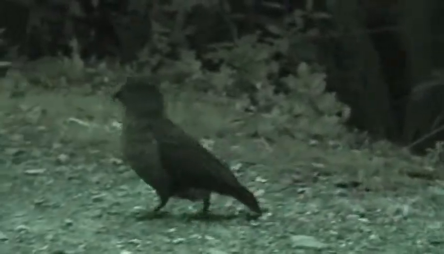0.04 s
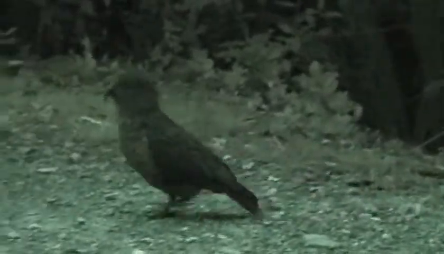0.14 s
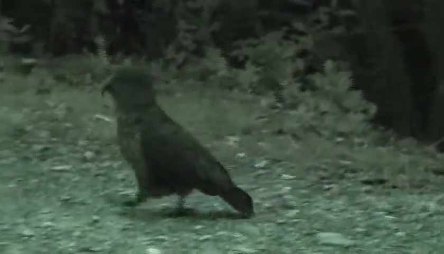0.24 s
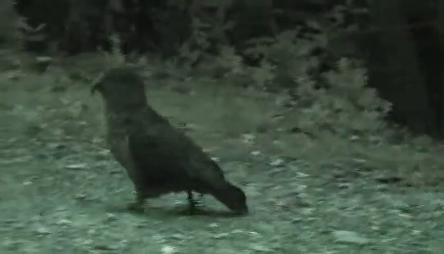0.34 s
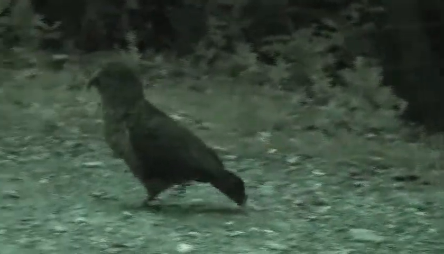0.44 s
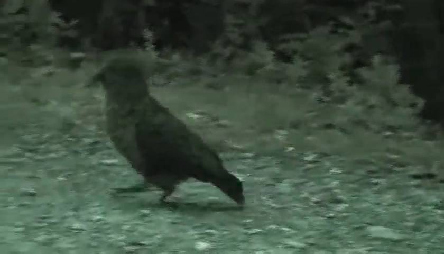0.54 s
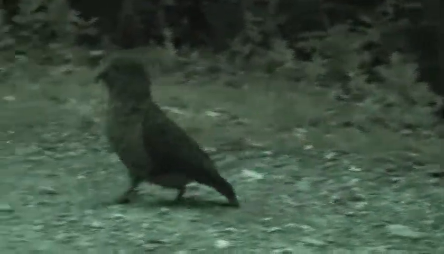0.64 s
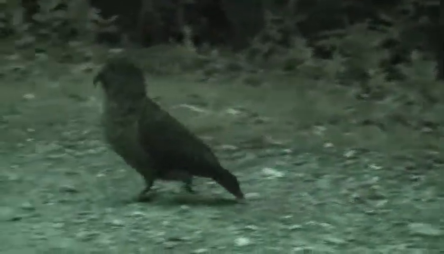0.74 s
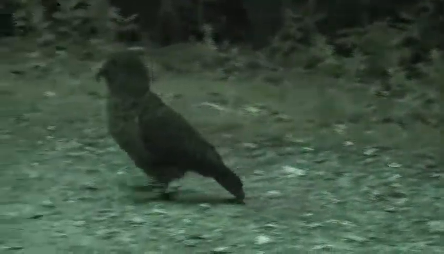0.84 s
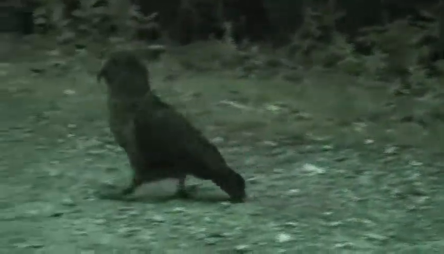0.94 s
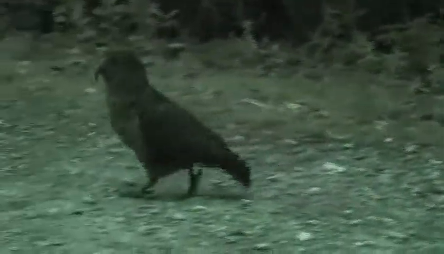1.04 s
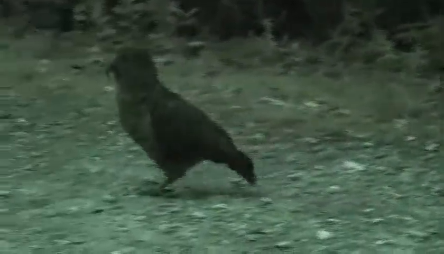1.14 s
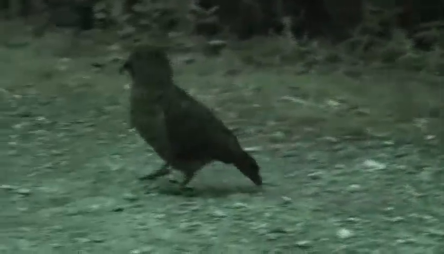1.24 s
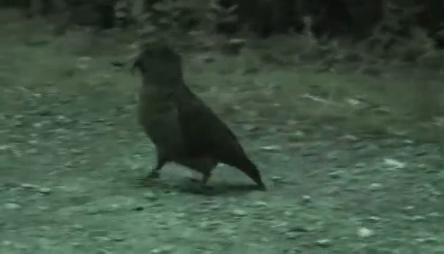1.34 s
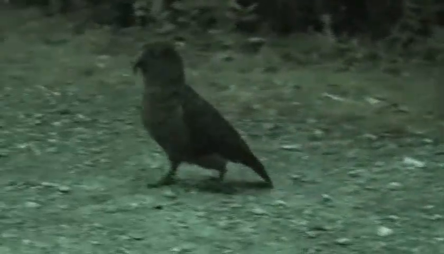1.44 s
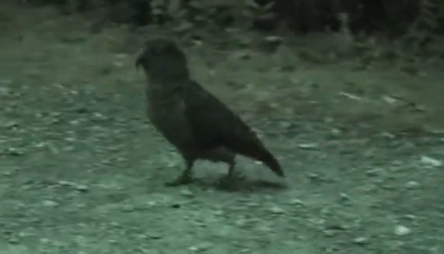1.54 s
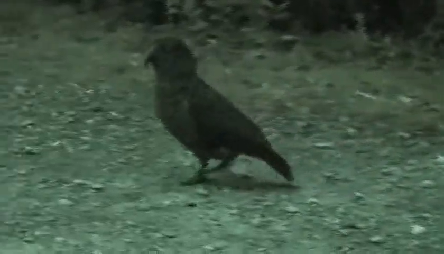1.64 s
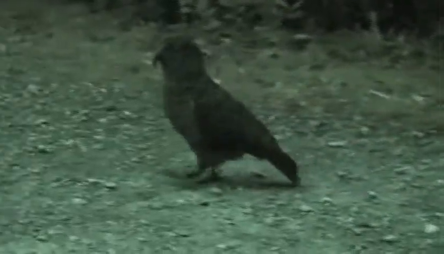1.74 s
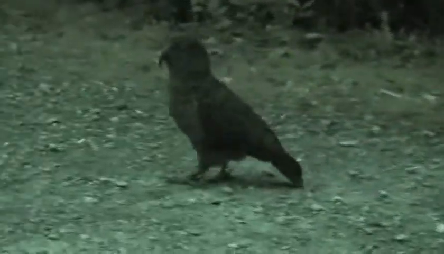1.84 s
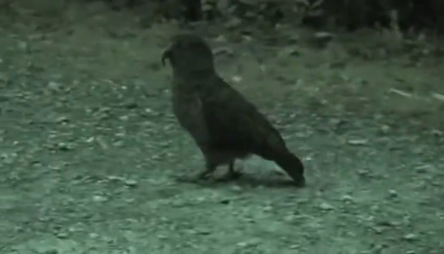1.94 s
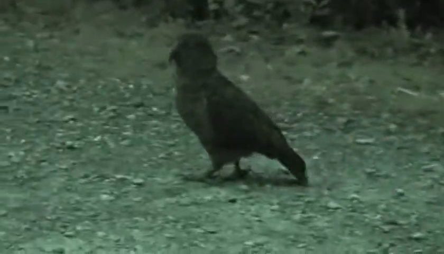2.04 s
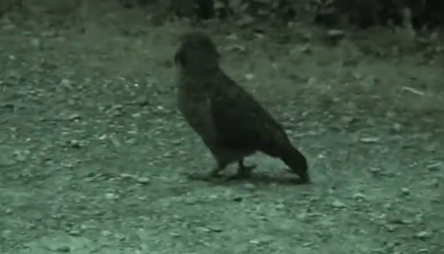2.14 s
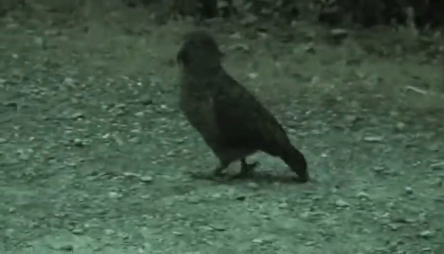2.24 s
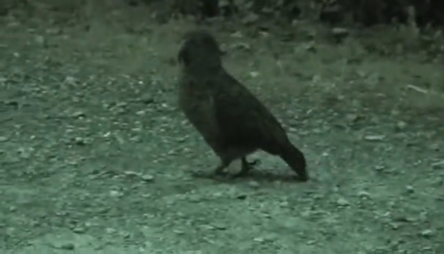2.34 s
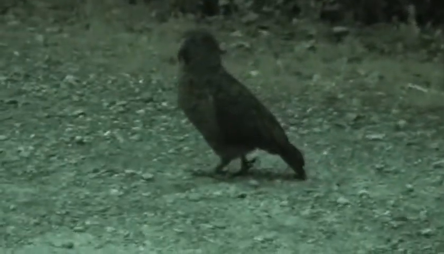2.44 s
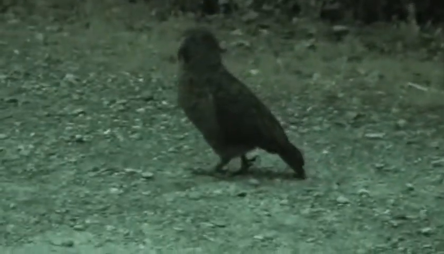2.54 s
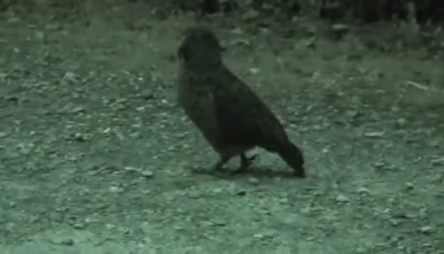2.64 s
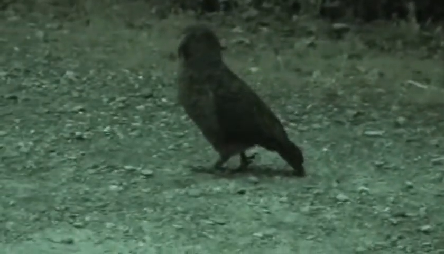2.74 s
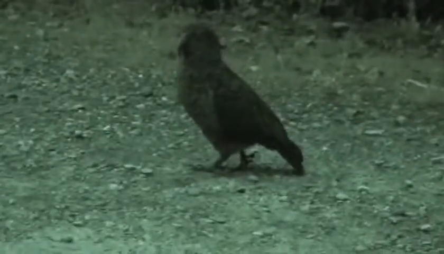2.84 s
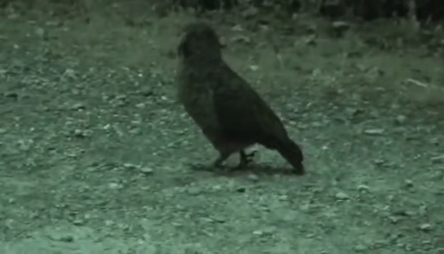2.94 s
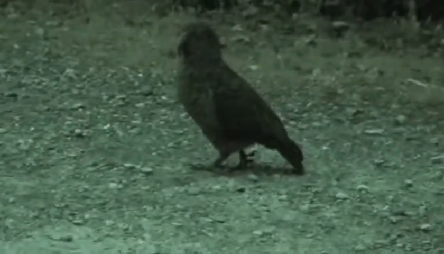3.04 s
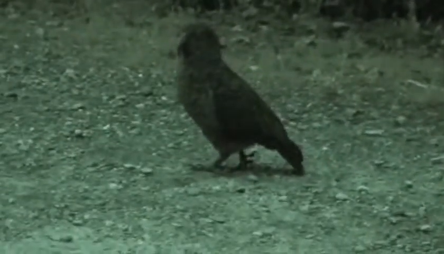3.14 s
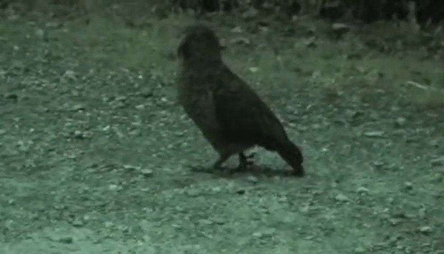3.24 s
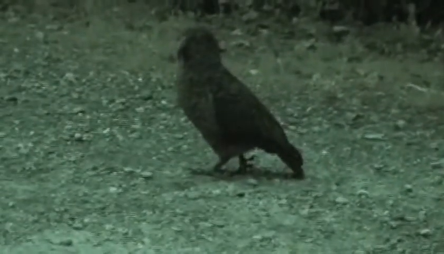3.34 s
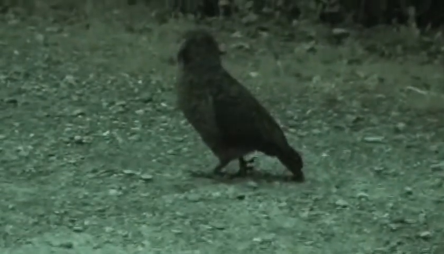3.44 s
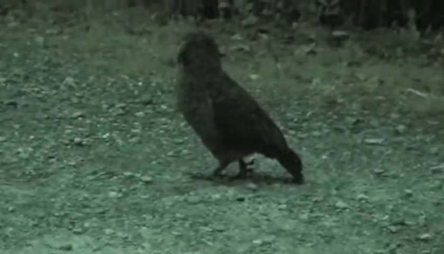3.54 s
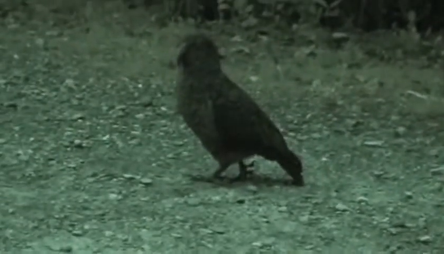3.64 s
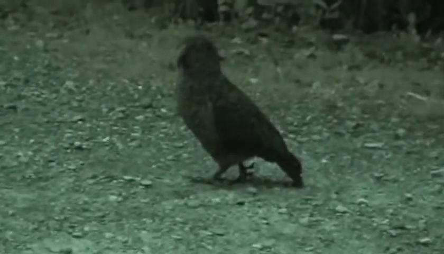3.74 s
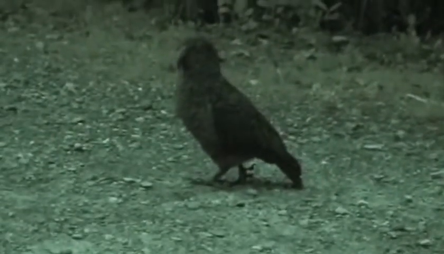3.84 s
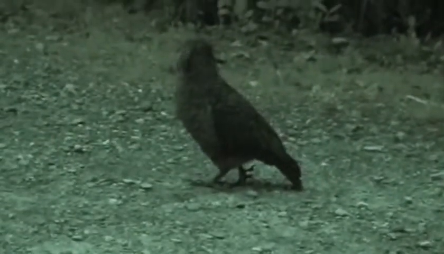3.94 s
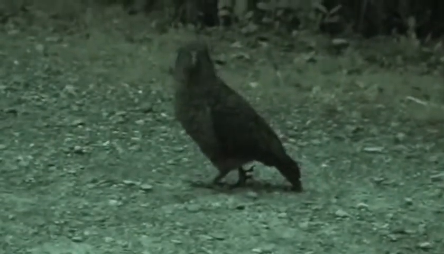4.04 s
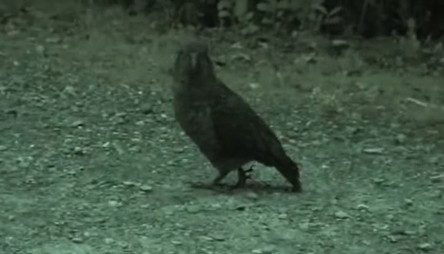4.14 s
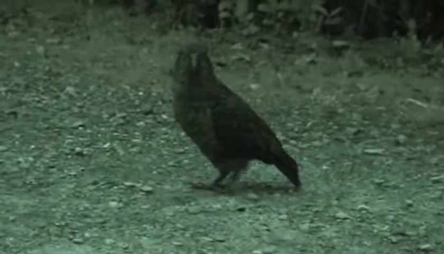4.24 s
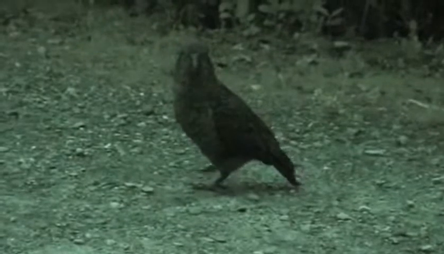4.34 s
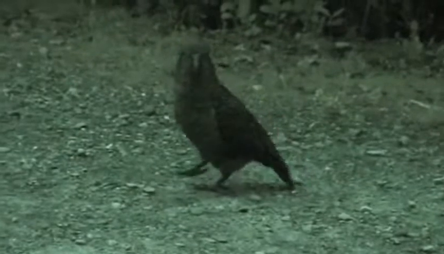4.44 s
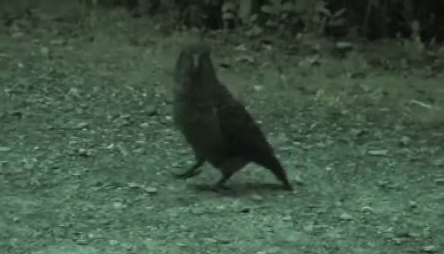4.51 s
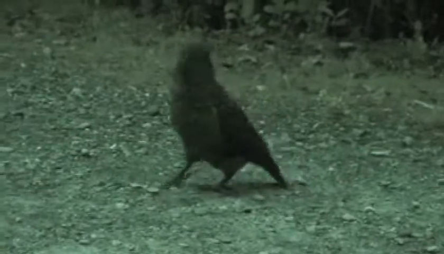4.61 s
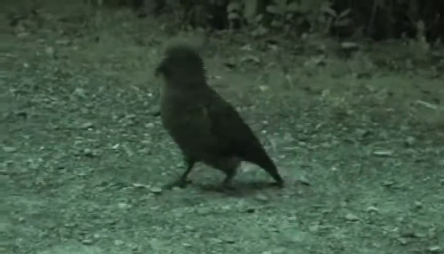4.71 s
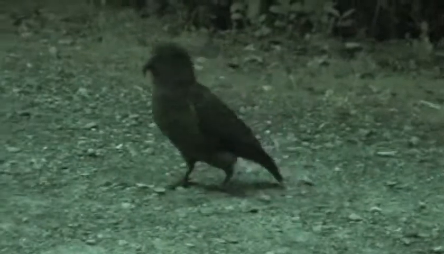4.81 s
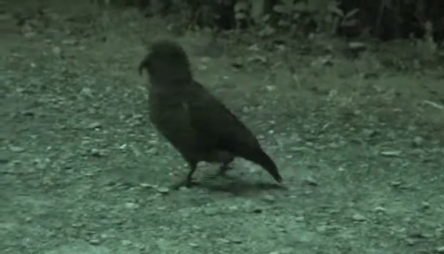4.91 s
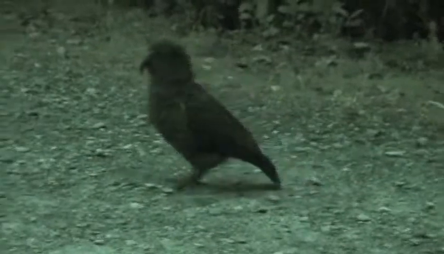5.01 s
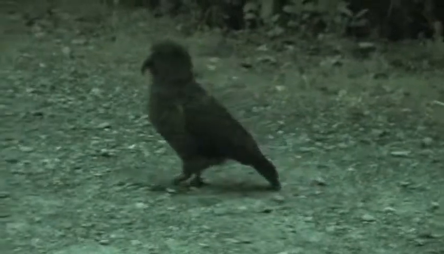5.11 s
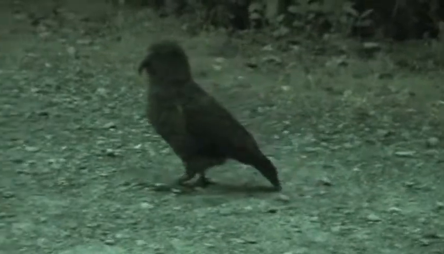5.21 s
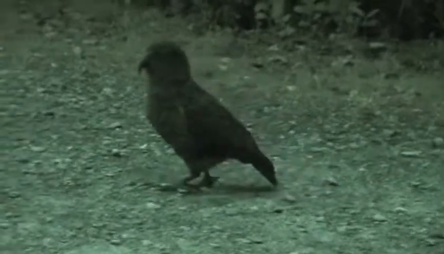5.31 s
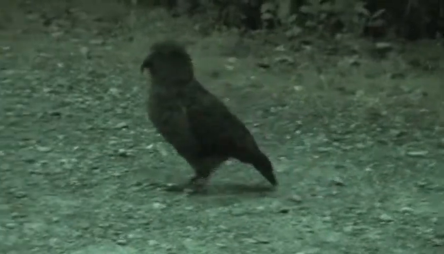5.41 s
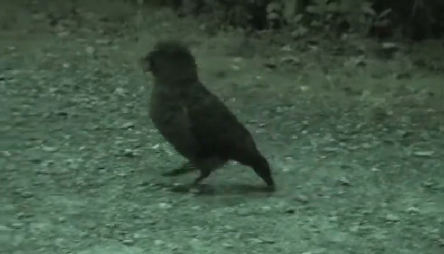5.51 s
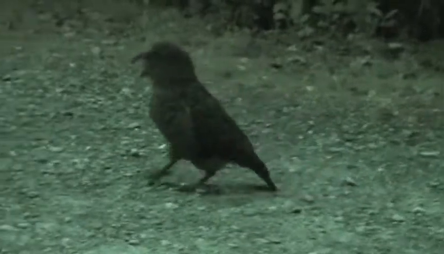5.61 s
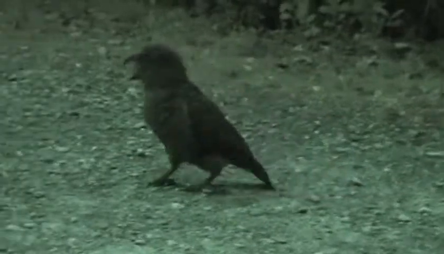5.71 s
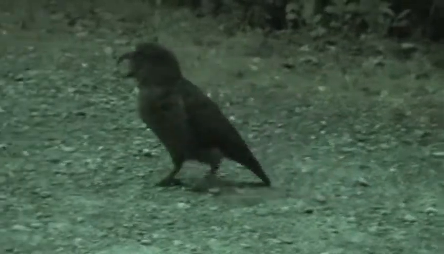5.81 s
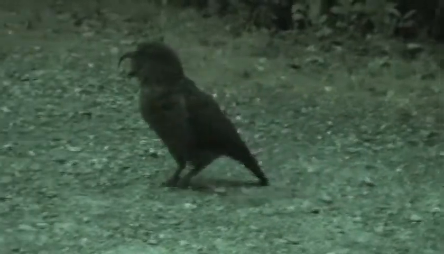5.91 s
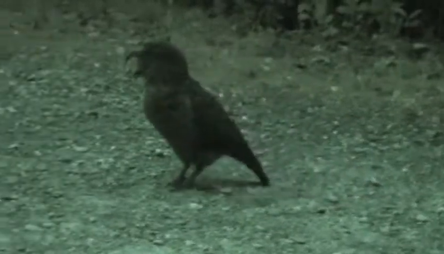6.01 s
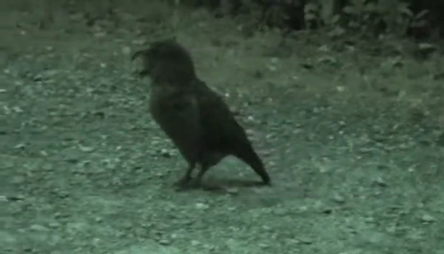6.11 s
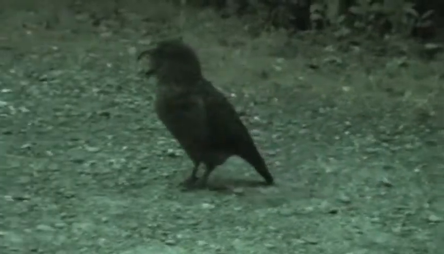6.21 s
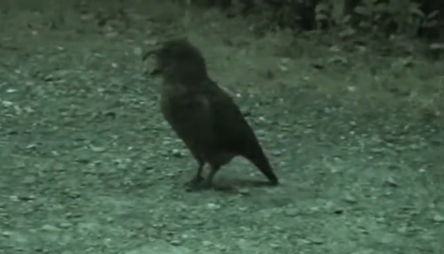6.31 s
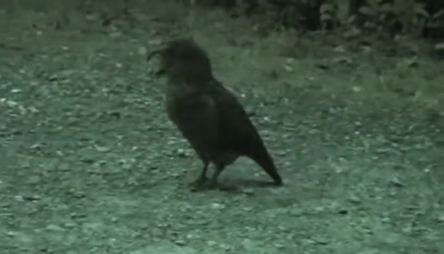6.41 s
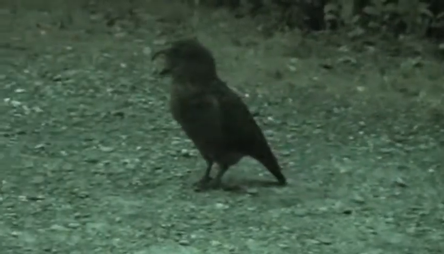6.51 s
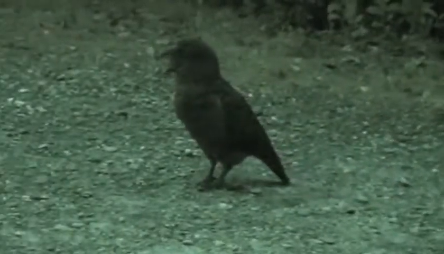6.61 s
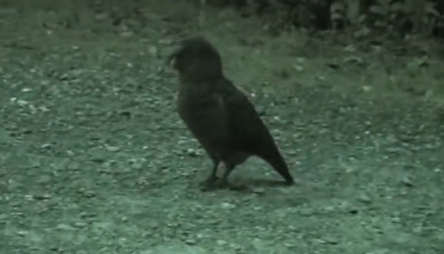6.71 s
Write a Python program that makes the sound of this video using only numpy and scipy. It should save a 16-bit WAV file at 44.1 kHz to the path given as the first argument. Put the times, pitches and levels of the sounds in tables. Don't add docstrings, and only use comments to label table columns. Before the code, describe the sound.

Over a faint stream rush and tiny distant birdsong, a parrot gives one loud, harsh, trilled falling scream late on, then quiet returns.

```python
import sys
import numpy as np
from scipy import signal
from scipy.fft import rfft, irfft
from scipy.io import wavfile
from scipy.ndimage import uniform_filter1d

SR = 44100
rng = np.random.default_rng(int(sys.argv[2]) if len(sys.argv) > 2 else 0)


def wrap_up_sound(samples):
    columns = np.atleast_2d(samples).T
    tamed = np.clip(columns, -1, 1)
    steps = np.round(tamed * 32767).astype(np.int16)
    wavfile.write(sys.argv[1], SR, steps)


def elevation(decibels):
    levels = np.asarray(decibels, float)
    return 10 ** (levels / 20)


N = 298116
T = np.arange(N) / SR
START_S, CLOSE_S, CLOSE_LENGTH_S = 5.604, 6.642, .019


def lookup(table, hz):
    f, db = np.transpose(table)
    return np.interp(np.log(np.maximum(hz, 1)), np.log(f), db)


def unit(x):
    return x / np.sqrt(np.mean(x ** 2))


def colour(x, *tables):
    hz = np.arange(len(x) // 2 + 1) * SR / len(x)
    return irfft(rfft(x) * elevation(sum(lookup(t, hz) for t in tables)), len(x))


def walk(rate, size=N):
    k = max(int(SR / rate), 1)
    return unit(uniform_filter1d(uniform_filter1d(rng.standard_normal(size), k), k))


def pan(x, db):
    return x * elevation(np.array([[db / 2], [-db / 2]]))


def step(t, at, width):
    return 1 / (1 + np.exp(-np.clip((t - at) / width, -30, 30)))


def opening(t):
    return step(t, 5.635, .005)


# (time [s], pitch before the voice break [Hz], level [dB], brightness [dB], breath [dB])
EFFORT = [
    (5.69, 1145, -6.7, 3, -25),
    (5.76, 1122, -9.3, -2, -35),
    (5.9, 1100, -8.3, -2, -32),
    (6.04, 1073, -10.5, -0.5, -29),
    (6.185, 1000, -10.5, 0.5, -25),
    (6.255, 1012, -11.5, 0, -26),
    (6.37, 952, -12.5, -5, -27),
    (6.52, 870, -14, -7.5, -27),
    (6.645, 778, -18, -11, -31),
]


def scream(t):
    s, *columns = np.transpose(EFFORT)
    hz, db, bright_db, breath_db = (np.interp(t, s, c) for c in columns)
    age = t - START_S
    thin = 1 - opening(t)
    break_s, break_width_s, recover_s = 6.396, .008, .07
    broken = step(t, break_s, break_width_s)
    weak = step(t - .01, break_s, break_width_s) * np.exp(-np.maximum(t - break_s, 0) / recover_s)
    closing = (np.maximum(t - CLOSE_S, 0) / CLOSE_LENGTH_S) ** 2
    scoop_hz, scoop_s, overshoot_hz, settle_s = 400, .017, 22, .014
    hz = hz - scoop_hz * np.maximum(1 - age / scoop_s, 0)
    hz = hz + overshoot_hz * np.exp(-abs(age - scoop_s) / settle_s)
    flick_hz, flick_s, floor_hz = 45, .016, 570
    hz = np.maximum(hz - 62 * broken - flick_hz * np.exp((t - CLOSE_S) / flick_s), floor_hz)
    swell_db = -33 * np.exp(-age / .006)
    db = db + swell_db - 8 * thin - 10 * weak - 50 * closing
    bright_db = bright_db - 16 * np.exp(-age / .008) + 5 * thin - 12 * closing
    return hz, db, bright_db, breath_db + 6 * (weak + closing)


# (time [s], depth [dB], pitch leap [Hz], raised shelf after it [Hz])
TRILL_CATCHES = [(5.714, -2.5, 25, 8), (5.774, -4, 44, 8), (5.83, -4, 40, 10), (5.886, -6, 130, 15),
                 (5.9405, -25, 60, 15), (5.992, -5, 146, 22), (6.048, -8, 120, 33), (6.1005, -6, 140, 42),
                 (6.154, -4.5, 150, 50), (6.2115, -3, 167, 68), (6.262, -1, 15, 12)]


def trill(t, hz, db):
    shelf_s, lead_s, rebound_db, rebound_s, arch = .019, .014, 1.5, .025, .25
    choke_db = 0
    for at, depth_db, leap_hz, shelf_hz in TRILL_CATCHES:
        d = t - at
        half = .003 - .00006 * depth_db
        db = db + rebound_db * step(d, half, .001) * np.exp(-np.maximum(d, 0) / rebound_s)
        creep = np.exp(np.minimum(d, 0) / lead_s)
        hold = np.where(d < 0, creep, 1 - step(d, shelf_s, .0012))
        hz = hz + leap_hz * np.exp(-(d / (.8 * half)) ** 2) + shelf_hz * hold
        closure = np.exp(-abs(d / half) ** 3.0)
        sag = np.exp(-abs(d) / np.where(d < 0, .02, .004))
        choke_db = choke_db + depth_db * (closure + arch * sag)
    return hz, db, choke_db


# (frequency [Hz], level [dB])
THROAT_TONE = [(700, -32.5), (1150, -31.5), (1480, -38.5), (1680, -21.5), (2320, -8.5), (2620, -19.5),
               (2900, -10), (3450, -19), (4300, -23), (5300, -19.5), (6500, -27.5), (7300, -39.5),
               (8700, -29), (13000, -54.5)]


def parrot():
    inside = (T > START_S) & (T < CLOSE_S + CLOSE_LENGTH_S)
    t = T[inside]
    size = len(t)
    glide_hz, db, bright_db, breath_db = scream(t)
    hz, db, choke_db = trill(t, glide_hz * (1 + .0026 * walk(137, size)), db)
    hz = hz * (1 + .004 * choke_db * walk(900, size))
    phase = 2 * np.pi * np.cumsum(hz) / SR
    wandering_hz = 4720 + 40 * walk(9, size)
    sliding_hz = np.interp(t, [5.82, 6.2], [4490, 4040])
    opened, bright_hz, twist = opening(t), 4000, .1
    tones, power = 0, 0
    for k in range(1, 21):
        ratio = bright_hz / (k * glide_hz)
        tilt_db = bright_db * (1 / (1 + ratio ** 6) + .47 / (1 + (2 * ratio) ** 6))
        power = power + elevation(lookup(THROAT_TONE, k * glide_hz) + tilt_db) ** 2 / 2
        notch = np.exp(-((k * hz - wandering_hz) / 250) ** 2) + np.exp(-((k * hz - sliding_hz) / 110) ** 2)
        notch = notch * opened + .45 * np.exp(-((k * hz - 3480) / 120) ** 2)
        flicker_db, rasp_db = .26 * walk(40, size), .29 * walk(400, size)
        own_db = (k + 10 * notch) * (flicker_db + rasp_db)
        own_db = own_db + choke_db * (1 + .41 * (2 < k < 6))
        gain = elevation(lookup(THROAT_TONE, k * hz) + tilt_db - 14 * notch + own_db) * (k * hz < 14000)
        tones = tones + gain * np.cos(k * phase - twist * k ** 2)
    air = rng.standard_normal(size) * (1 + .7 * np.cos(phase))
    air_tone = [(1500, 4.5), (2300, -8.5), (3700, 5.5), (4150, -14), (4700, 6.5), (9000, 10)]
    breath = unit(colour(air, THROAT_TONE, air_tone))
    breath_gain = elevation(breath_db + .34 * bright_db - .35 * choke_db)
    out = np.zeros(N)
    out[inside] = elevation(db) * (tones / np.sqrt(power) + breath_gain * breath)
    return out


# (frequency [Hz], level per Hz [dB])
FUZZ_TONE = [(800, -27), (1150, -22), (1350, -33), (1600, -18), (2300, -17), (3400, -4), (3900, -9),
             (4150, -30), (4500, -12), (5800, -8), (7300, -15), (8800, -8), (10800, -19.5), (13500, -25)]
# (frequency [Hz], level [dB])
FUZZ_APART = [(10600, 0), (11200, -25)]


def fuzz(call, db=-23, frame_s=0.022, slope=1.3):
    k = int(frame_s * SR)
    bright = colour(call, [(2500, -2), (6000, 14)])
    smooth = uniform_filter1d(uniform_filter1d(bright ** 2, k), k // 2)
    loud = np.sqrt(np.maximum(smooth, 0))
    both = rng.standard_normal(N)
    sides = [colour(rng.standard_normal(N), FUZZ_APART) + .33 * both for _ in range(2)]
    hiss = np.array([unit(colour(side, FUZZ_TONE)) for side in sides])
    return elevation(db) * np.abs(call).max() / 2 * (loud / loud.max()) ** slope * hiss


def bush(x, db, t60_s, gap_s):
    t = T[:SR]
    tail = rng.standard_normal((2, SR)) * elevation(-60 * t / t60_s) * (t > gap_s)
    leaf_tone = [(1500, 3), (2300, -2.5), (4000, 5.5), (10000, 4)]
    tail = np.array([colour(unit(c), leaf_tone) for c in tail]) / np.sqrt(SR)
    return elevation(db) * signal.fftconvolve(np.atleast_2d(x), tail, axes=1)[:, :N]


def songbirds(notes, wobble, lift_db, echo_db):
    out = np.zeros((2, N))
    shake, swell = walk(61), walk(40)
    for at, length, hz0, hz1, db, pan_db in notes:
        i = slice(int(at * SR), int((at + length) * SR))
        u = (T[i] - at) / length
        hz = (hz0 + (hz1 - hz0) * u) * (1 + wobble * shake[i])
        shape = np.sqrt(np.sin(np.pi * np.clip(u, 0, 1) ** .85))
        shape = shape * elevation(db + lift_db + 1.2 * swell[i])
        out[:, i] += pan(shape * np.sin(2 * np.pi * np.cumsum(hz) / SR), pan_db)
    return out + bush(out.mean(0), db=echo_db, t60_s=.6, gap_s=.02)


# (time [s], pitch [Hz], level [dB])
WARBLER_PHRASES = [(.195, 6690, -62), (1.0, 6660, -62.5), (1.795, 6610, -62), (2.625, 6540, -59.5),
                   (3.405, 6520, -63.4), (4.21, 6560, -65), (5.02, 6600, -64)]
SLIDE_DELAYS = [.165, .14, .175, .155, .23]
# (time [s], pitch [Hz], level [dB])
HIGH_PIPS = [(.15, 7520, -66), (.59, 7487, -72), (.72, 7500, -69.5), (.945, 7475, -67), (1.35, 7440, -67),
             (1.525, 7400, -68), (1.76, 7530, -72), (2.17, 7330, -69), (2.35, 7380, -68), (2.6, 7500, -69),
             (2.96, 7360, -71), (3.2, 7480, -70), (3.43, 7500, -71), (3.79, 7300, -72),
             (4.025, 7440, -69.5), (4.6, 7330, -67.5), (4.835, 7420, -68.5)]


def warbler():
    notes = []
    for at, hz, db in WARBLER_PHRASES:
        notes.append((at, .05, hz - 290, hz - 250, db - 6.5, .7))
        notes.append((at + .055, .065, hz, hz + 10, db, .7))
    for (at, _, _), delay in zip(WARBLER_PHRASES, SLIDE_DELAYS):
        notes.append((at + delay, .15, 6510, 6950, -68.5, .7))
    for at, hz, db in HIGH_PIPS:
        notes.append((at, .058, hz + 15, hz - 15, db, -4))
    return songbirds(notes, wobble=.0061, lift_db=4.5, echo_db=-11)


# (time [s], length [s], pitch [Hz], level [dB], left minus right [dB])
LOW_WHISTLES = [(0.105, 0.076, 2211, -50, -11), (0.23, 0.037, 2213, -62, -6.3),
                (0.175, 0.19, 1560, -57.5, 12), (1.555, 0.125, 1905, -61.5, -4.6), (1.7, .17, 2400, -65, 0),
                (2.425, 0.12, 2147, -55, 6), (2.62, 0.05, 2150, -59, -6.6), (3.38, 0.1, 2260, -61.4, 5.2),
                (3.52, 0.1, 1895, -63, 7), (4.525, 0.175, 1823, -53.5, 8), (4.885, 0.065, 2150, -51.9, 8),
                (5.93, .12, 1565, -45, 12)]


def whistlers():
    notes = [(at, s, hz + 7, hz - 7, db, pan_db) for at, s, hz, db, pan_db in LOW_WHISTLES]
    return songbirds(notes, wobble=.0042, lift_db=4.5, echo_db=-3.5)


# (time [s], length [s], start pitch [Hz], end pitch [Hz], level [dB])
GLIDING_CHIRPS = [(2.82, .08, 2650, 2820, -63), (2.95, 0.04, 4747, 4676, -70.6),
                  (3.095, 0.068, 4350, 3940, -61), (3.34, .03, 2600, 2480, -61.5),
                  (3.41, .03, 3950, 4100, -70.5), (3.46, 0.045, 4141, 3990, -62.5),
                  (3.615, 0.03, 3514, 3567, -64), (3.74, 0.035, 4129, 3841, -63.9),
                  (3.815, 0.045, 6592, 5887, -69), (3.82, 0.2, 3520, 3490, -67),
                  (3.95, 0.035, 4137, 4530, -62), (3.972, .03, 4470, 4500, -69),
                  (3.985, 0.065, 4567, 3980, -64), (4.08, 0.06, 6394, 5600, -69),
                  (4.125, .03, 5200, 5050, -69.5), (4.15, 0.07, 4947, 4728, -72),
                  (4.31, 0.055, 4378, 4427, -67), (4.62, 0.075, 5940, 6230, -72.6)]


def chirpers():
    notes = [(*row, 3) for row in GLIDING_CHIRPS]
    return songbirds(notes, wobble=.005, lift_db=4.5, echo_db=-11)


# (time [s], start pitch [Hz], end pitch [Hz], level [dB])
PAIRED_TICKS = [(2.704, 5050, 4950, -62), (2.724, 5050, 4850, -57), (2.767, 4850, 5100, -58),
                (2.788, 4950, 5100, -54), (2.822, 5050, 5150, -64), (2.853, 5050, 5100, -64)]


def tickers():
    notes = [(at, .009, hz0, hz1, db, 0) for at, hz0, hz1, db in PAIRED_TICKS]
    return songbirds(notes, wobble=.002, lift_db=3.0, echo_db=-9)


# (time [s], length [s], centre [Hz], width [Hz],
# level [dB])
GRAVEL_SCUFFS = [
    (2.29, 0.06, 450, 400, -47),
    (2.661, .03, 600, 500, -47),
    (5.262, .06, 5000, 4000, -58),
    (5.333, 0.027, 6000, 6000, -52),
    (5.653, 0.086, 400, 650, -47),
]


def scuffs():
    out, grit = 0, rng.standard_normal(N) * elevation(1.8 * rng.exponential(size=N))
    for at, length, hz, width_hz, db in GRAVEL_SCUFFS:
        low_hz, high_hz = hz - width_hz / 2, hz + width_hz / 2
        band = unit(colour(grit, [(low_hz / 4, -40), (low_hz, 0), (high_hz, 0), (high_hz * 3, -40)]))
        out = out + elevation(db) * band * np.exp(-((T - at) / (length / 2)) ** 2)
    return out


# (frequency [Hz], level per Hz [dB])
STREAM_TONE = [(15, -37), (25, -12), (64, -3), (243, -2.5), (347, -3), (609, -2), (710, -3.5), (2360, -12),
               (4140, -20.5), (6070, -24.5), (6720, -25), (7830, -26), (11200, -27.5), (14600, -51),
               (22000, -120)]
# (frequency [Hz], side minus mid [dB])
STREAM_WIDTH = [(60, -21), (110, -19), (200, -12.5), (370, -10.5), (670, -6.5), (1220, -3), (2220, -4.5),
                (4060, -2.5), (7410, 0.5), (13500, -4.5)]


def stream(level_db=-47, swell_db=0.34, flicker_db=.5):
    mid = colour(rng.standard_normal(N), STREAM_TONE)
    side = colour(rng.standard_normal(N), STREAM_TONE, STREAM_WIDTH)
    out, swell = 0, walk(0.97)
    octave = np.log2(np.maximum(np.arange(N // 2 + 1) * SR / N, 1) / 20)
    for k in range(11):
        share = np.clip(1 - abs(octave - k), 0, 1)
        pair = irfft(rfft([mid + side, mid - side]) * share, N)
        out = out + pair * elevation(swell_db * swell + flicker_db * walk(7.9))
    return out * elevation(level_db) / np.std(mid)


# (frequency [Hz], level [dB])
TOP_HISS = [(11100, -40), (11400, 0), (13800, 1), (13900, -40)]


def camcorder(duty=0.27, grain_db=0.5):
    turn = (T * 31.24) % 1
    burst = np.exp(-((turn - .5) / (duty / 2)) ** 2)
    whine = unit(burst * np.sin(2 * np.pi * 8969 * T))
    hum = np.sqrt(2) * np.sin(2 * np.pi * 128.5 * np.cumsum(1 + .02 * walk(5)) / SR)
    drive = np.sqrt(2) * np.sin(2 * np.pi * 5785 * np.cumsum(1 + .003 * walk(8)) / SR)
    both, apart = rng.standard_normal((2, N)) * elevation(grain_db * walk(170))
    top = np.array([colour(both + .15 * apart, TOP_HISS), colour(both - .15 * apart, TOP_HISS)])
    tones = elevation(-75) * whine + elevation(-68.5 + 5.0 * walk(7.3)) * hum + elevation(-79.5 + 3 * walk(2.6)) * drive
    return tones + elevation(-67) * unit(top)


def duck(call, depth_db=-6.0, wait_s=0.08, attack_s=.1, ease_s=0.33):
    since = np.maximum(T - T[np.nonzero(call)[0][0]] - wait_s, 0)
    pull = (1 - np.exp(-since / attack_s)) * (0.2 + 0.83 * np.exp(-since / ease_s))
    return elevation(depth_db * 2 * pull)


def scene():
    call = parrot()
    right_tone = [(1500, 0), (2300, .6), (5000, 0), (8000, -1.5), (11000, 0)]
    near = np.array([call, colour(call, right_tone)])
    birds = warbler() + whistlers() + chirpers() + tickers()
    back = stream() + birds + scuffs() + camcorder()
    echo = bush(call, db=-18.5, t60_s=0.54, gap_s=.004)
    return near + fuzz(call) + echo + duck(call) * back


def band_limit(x):
    return signal.sosfilt(signal.butter(12, 14130, fs=SR, output="sos"), x)


# (frequency [Hz], level [dB])
TOP_CUT = [(13350, 0), (13620, -9), (13720, -60)]


def record(dry):
    cut = np.array([colour(c, TOP_CUT) for c in np.clip(dry, -.9, .9)])
    return band_limit(cut)


dry = scene()
out = record(dry)
wrap_up_sound(out)
```